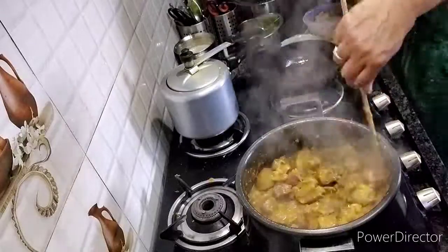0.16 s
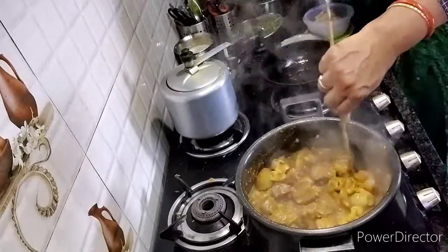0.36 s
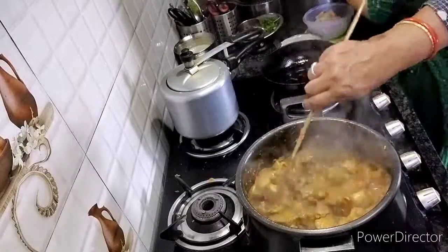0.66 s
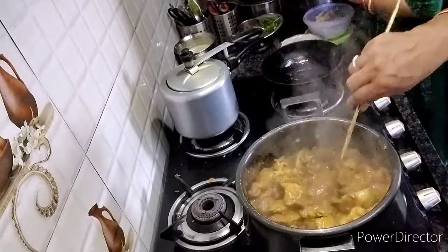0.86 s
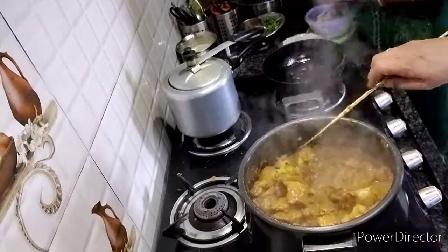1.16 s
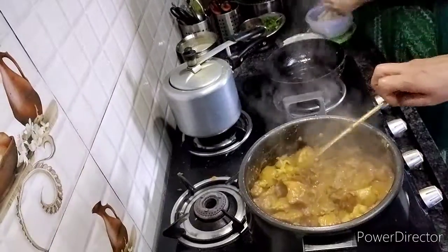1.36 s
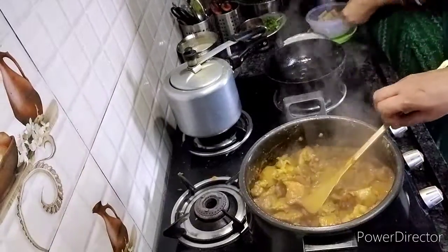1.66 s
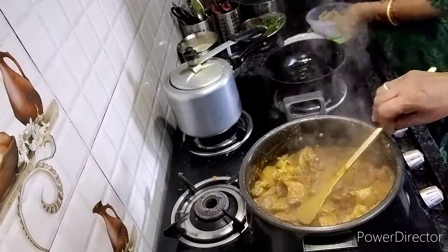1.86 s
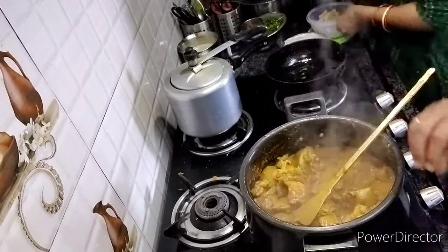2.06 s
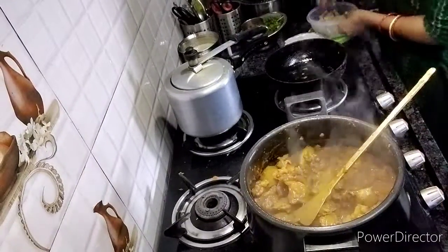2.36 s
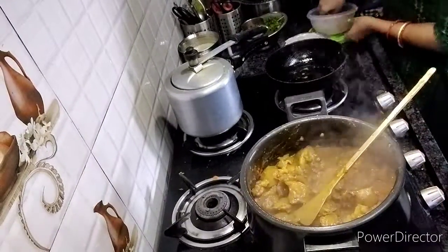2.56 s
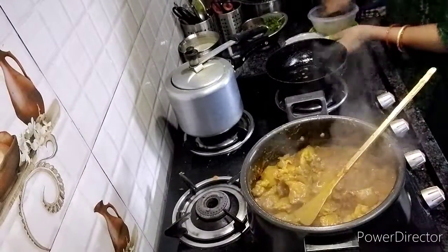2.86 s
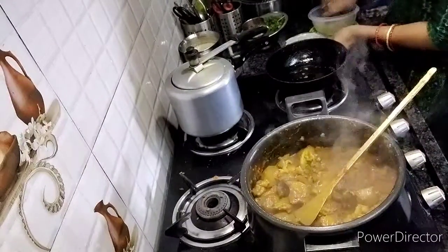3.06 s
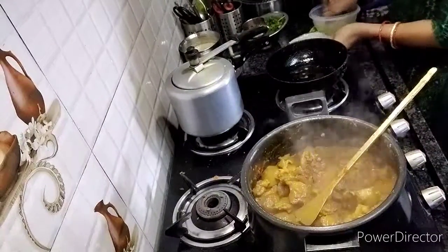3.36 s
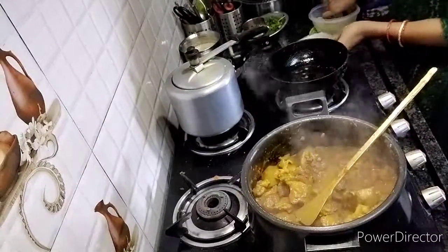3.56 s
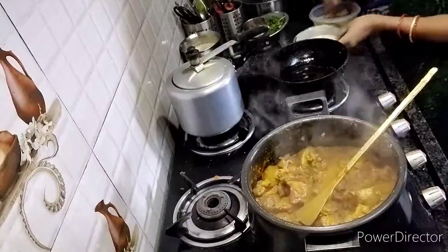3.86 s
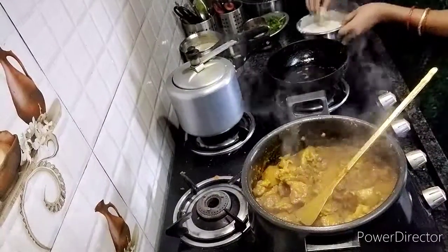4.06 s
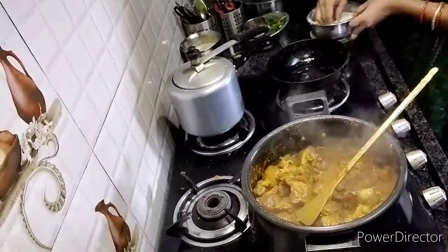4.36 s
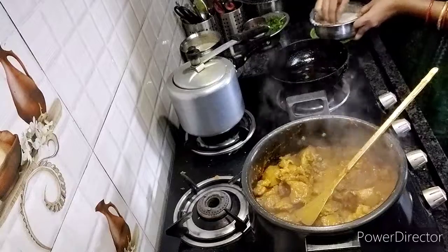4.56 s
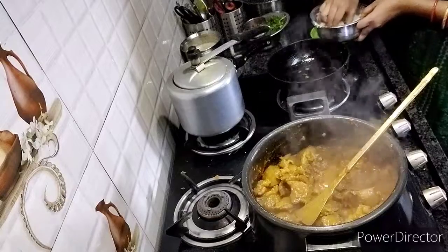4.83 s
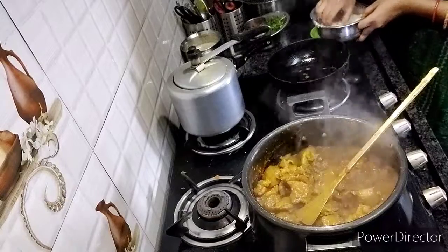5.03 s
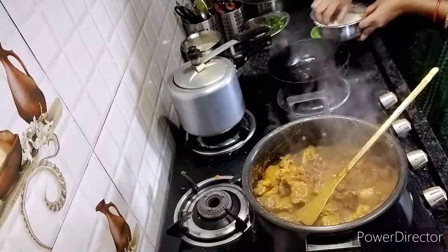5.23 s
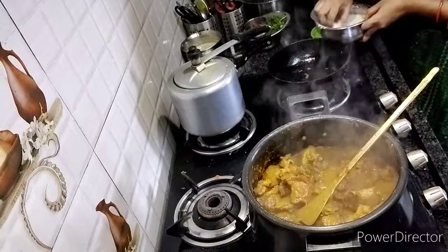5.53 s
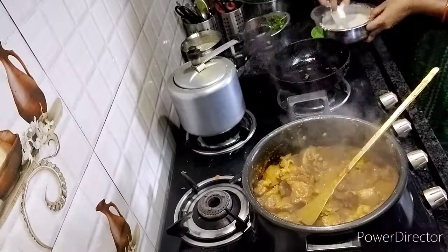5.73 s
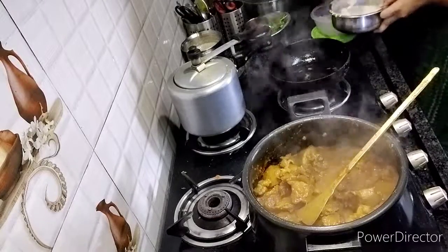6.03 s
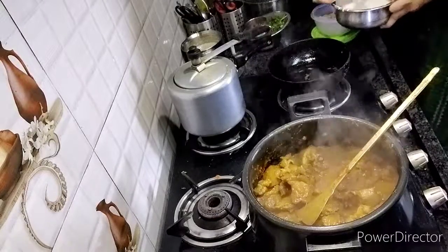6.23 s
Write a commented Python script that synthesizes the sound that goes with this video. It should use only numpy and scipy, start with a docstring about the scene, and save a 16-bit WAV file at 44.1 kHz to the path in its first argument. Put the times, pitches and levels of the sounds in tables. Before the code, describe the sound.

A gas flame and simmering curry make a very quiet low murmur with fine bubbling hiss throughout, swelling slightly around 1.4 and 4.4 s, with barely audible wavering hums. From 0 to 0.6 s a blade makes soft wet smacks, with small clicks at 0.2 and 0.45 s. At 1.0 s the wooden spatula hits the steel pot's rim: a sudden loud, hollow, tightly chattering knock, with a short midrange metallic ring and tiled-room echoes. Lighter bounces and dull bumps follow until about 1.4 s, then small clicks to 1.7 s. Around 1.8 to 2.7 s only faint ticks remain. From 2.7 s to the end at 6.4 s, farther back, dry grains crunch and trickle in irregular short scoops, mixed with crisp bowl and tub clicks, clustered near 3.1 and 5.75 s, and tiny high clinks near 4.2 and 4.6 s.

```python
"""A gas flame and simmering curry murmur softly from the start, as shaped noise with bursting bubbles.
A blade pushes wetly through the curry amid small clicks and clinks, modelled as grains, noise and modes.
The wooden spatula then knocks on the steel pot's rim: contact pulses excite resonances and tiled-room echoes.
Behind the stove a hand scoops something dry from a plastic tub into a steel bowl: showers of grain impacts."""
import sys
import numpy as np
from scipy import signal
from scipy.fft import rfft, irfft
from scipy.io import wavfile

SR = 44100
rng = np.random.default_rng(int(sys.argv[2]) if len(sys.argv) > 2 else 0)


def dump_mix(stems):
    """Bounce the given channels to the path in sys.argv[1] as a 16-bit WAV at rate SR."""
    frames = np.atleast_2d(stems).T  # one column per channel
    limited = np.clip(frames, -1, 1)  # hard clip at full scale
    pcm = np.round(limited * 32767).astype(np.int16)
    wavfile.write(sys.argv[1], SR, pcm)


N = 282012
TIME = np.arange(N) / SR  # s

# Spectrum of the flame and simmer: f/Hz, relative level/dB
MURMUR_SPECTRUM = [(30, -21.5), (55, -7), (90, 0.5), (170, 0.5), (250, -3), (340, -7.5), (560, -2.5),
                   (750, -11), (1130, -5), (1400, -15), (1750, -12.5), (3000, -26), (6000, -42)]
MURMUR_DB = -65  # at mean vigour, before flutter
MURMUR_FOLLOWS = 0.18  # share of the sizzle's swing, dB per dB
FLUTTER_DB, FLUTTER_PER_S = 1.5, 14
# Sizzle through time: t/s, level/dB
SIZZLE_LEVEL = [(0, -69.5), (.9, -71), (1.35, -64.5), (1.9, -74.5), (2.5, -73), (2.9, -68), (4.4, -65),
                (5.0, -74), (6.39, -74.5)]
# Spectrum of the sizzle: f/Hz, relative level/dB
SIZZLE_SPECTRUM = [(600, -11.5), (1500, -4), (3000, -4), (4400, -1), (7500, -6), (8200, -9.5), (12000, -15),
                   (15000, -18.5)]
# Faint wavering tones: f/Hz, reference level/dB
HUM_TONES = [(290.7, -79), (577, -68.5)]
HUM_REST_DB = -5.5  # between swells, re the reference level
# Swells of the tones: t/s, rise/dB, half width/s
HUM_SWELLS = [(1.55, 10.5, 0.19), (2.56, 10.5, 0.18), (3.6, 6.5, 0.27)]
# Brief dips of the background level: t/s, change/dB, half width/s
BACKGROUND_DIPS = [(0.794, -34, 0.019), (0.887, -10.5, 0.034), (1.925, -14, 0.011), (4.491, -13, 0.012)]

# Pushes of the blade through the curry: t at full speed/s, length/s, level/dB
BLADE_PUSHES = [(.02, .07, -61.5), (.43, .03, -62.5), (.58, .06, -66.5), (1.3, .15, -75)]
# Spectrum of the wet smacks: f/Hz, relative level/dB
STIR_SPECTRUM = [(150, -14), (500, -1), (1600, 0.5), (2400, -5), (4000, -6.5), (8000, -16.5), (15000, -28)]
PUSH_RISE_DB_PER_S, PUSH_T60_S = 399, 0.33

# Utensils and bowls touching: t/s, level before filtering/dB, lows re middle/dB, highs re middle/dB;
# the level and both tilts receive common offsets in clicks()
TOUCHES = [(0.237, -38, -4.5, -25.5), (0.458, -43.5, -4, -21), (0.833, -56.5, 9, -21),
           (.954, -46, -17, -18.5), (1.251, -43.5, 8, -30), (1.3826, -46, 13.5, -28),
           (1.535, -37.5, -2, -13.5), (1.582, -45.5, 3, -16), (1.701, -34.5, 2, -31),
           (1.959, -46.5, 2, -24), (2.6878, -44.5, -1.5, -10.5), (3.1027, -33.5, -18.5, -19.5),
           (3.119, -35, -3, -10.5), (3.1434, -31.5, -5, -18), (3.254, -34.5, -13, -8.5),
           (3.4377, -37.5, -28, -15.5), (3.491, -37, -26.5, -6), (3.7414, -38, 1, -12),
           (3.9977, -38.5, -5, -8.5), (4.037, -38, -7, -10), (4.101, -48, -18.5, -12),
           (4.2174, -36, -6, -10), (4.2728, -44.5, 1, -1), (4.5145, -44.5, -4, -20.5),
           (4.583, -40, -9, -1.5), (4.7235, -31, -14, -15), (5.0574, -35.5, -5, -11.5),
           (5.4723, -33.5, -4, -11), (5.5864, -41.5, 0.5, -9.5), (5.7193, -40.5, -4, -14.5),
           (5.7513, -34.5, -5.5, -21), (5.7759, -31.5, -7, -15), (6.131, -37, -2, -12.5),
           (6.3512, -44.5, -6.5, -19)]
# Common spectrum of the touches: f/Hz, relative level/dB
TOUCH_SPECTRUM = [(150, -5.5), (500, 4), (1200, 0), (3000, 3), (4400, 6.5), (6200, 0.5), (7500, 7),
                  (9000, 6), (15000, 0)]
# Fainter touches come at random while the hand reaches for the tub
REACH_FROM_S, REACH_UNTIL_S = 1.8, 2.9
FAINT_DB, FAINT_SPREAD_DB, FAINT_LOW_DB, FAINT_TOP_DB = -53.5, 2, -4.5, -25

# Decay of the room: f/Hz, t60/s
ROOM_DECAY = [(100, 0.99), (500, 0.53), (1200, 0.38), (2500, 0.38), (5000, 0.18), (14000, .22)]

# Thin clinks, as of bangles: t/s, impulse level/dB
BANGLE_TAPS = [(0.43, -58), (4.223, -42), (4.608, -42), (5.955, -55.5)]
# Modes of a clink: f/Hz, relative level/dB, t60/s
BANGLE_MODES = [(14080, -9, 0.056), (13860, -1, 0.065)]

# The spatula hits the rim and chatters: each contact comes sooner, is duller and carries less into the room
BLOW_S, CHATTER_GAP_S, GAP_SHRINK = 1.0078, .004, .85
BLOW_DB, BLOW_BRIGHT_HZ, DULLING = 1.5, 2500, 0.81
BLOW_ROOM_DB, ROOM_LOSS_DB = 3, 1.5
FIRST_SOFTER_DB = 4.5  # the blade gives at first, then bears down
# Lighter contacts, a graze before the blow and bounces after it:
# t/s, force level/dB, contact brightness f/Hz, share sent to the room/dB
LIGHT_CONTACTS = [(1.0047, -11, 1500, -13), (1.0368, -12.5, 1500, -3), (1.084, -11, 1980, 5.5),
                  (1.1217, -16, 2600, -0.5), (1.136, -12, 1110, -6), (1.2474, -27.5, 2600, 8)]
# Broad resonances of blade and loaded pot: f/Hz, width/Hz, relative level/dB
BODY_RESONANCES = [(305, 170, -6.5), (530, 220, 2.5), (805, 87, -7.5), (1110, 260, -10), (1660, 170, -16),
                   (2600, 980, -21), (4000, 1300, -24)]
# Modes of the pot wall: f/Hz, relative level/dB, t60/s
POT_MODES = [(205, -15, .45), (300, 7, .15), (377, -4, .42), (430.5, -2, .55), (483.5, -5, .5),
             (523.5, 0, .52), (557, -4, .55), (598, -9, .42), (622, -8, .42), (662, 0, .52),
             (708.5, -8, .42), (766, -8, .38), (803, -5, .55), (840, -7, .42), (868, -4, .45),
             (953, -8, .38), (1062, -8, .38), (1115, -4, .4), (1200, -9, .36), (1275, -13, .4),
             (1787, -14, .38), (1906, -18, .44), (2240, -21, .35), (2654, -23, .32), (3031, -23, .3)]
RING_DB, FADE_S, FADE_T60_S = -20.5, 1.26, 0.078
# Spectrum of the knock sent into the room: f/Hz, gain/dB
ROOM_SPREAD = [(150, -1.5), (300, -9), (550, -8.5), (900, -3), (1400, -2), (2500, 2), (4000, 5.5),
               (8000, 8.5)]

# Dull bumps of the pot and other heavy things: t/s, level/dB, f/Hz, t60/s
HEAVY_BUMPS = [(1.138, -25, 290, .12), (1.245, -30, 118, .11), (1.378, -41, 335, .09),
               (1.442, -50, 480, .08), (1.815, -51, 370, .12), (3.683, -49, 430, .1)]

# Strokes of the fingers through the grains: t at full speed/s, length/s, level/dB
SCOOP_STROKES = [(2.705, 0.0082, -57.5), (2.82, .035, -46), (3.01, 0.14, -55.5), (3.125, 0.13, -55),
                 (3.3, 0.033, -51), (3.465, 0.07, -51), (3.605, .025, -53.5), (3.69, 0.066, -49),
                 (4.04, 0.068, -49), (4.22, 0.032, -48.5), (4.565, 0.035, -46.5), (4.735, 0.031, -52.5),
                 (5.075, 0.044, -50.5), (5.2, 0.33, -56), (5.78, 0.16, -57), (5.925, 0.075, -53.5),
                 (6.15, 0.0067, -49.5), (6.345, 0.047, -63.5)]
# Spectrum of the grains: f/Hz, relative level/dB
GRAIN_SPECTRUM = [(120, -9), (200, -5), (327, -11.5), (554, 0.5), (618, -10.5), (827, -2.5), (906, -5.5),
                  (1510, -8.5), (2090, -6), (3680, -8.5), (4180, -3), (7480, -8), (13400, -21),
                  (14400, -18), (15500, -29.5)]
# A stroke gathers speed quickly; the grains then trickle to rest
SCOOP_RISE_DB_PER_S, SCOOP_T60_S = 579, 0.27

CUTOFF_HZ = 15450


def from_db(db):
    """Logarithmic level: decibels become an amplitude gain."""
    return 10 ** (np.asarray(db) / 20)


def rms_one(x):
    """Power normalisation: scale a signal to rms 1."""
    return x / np.sqrt(np.mean(x ** 2) + 1e-20)


def at_hz(points, hz):
    """Logarithmic frequency scale: interpolate a table between octaves evenly."""
    f, value = np.transpose(points)
    return np.interp(np.log(np.maximum(hz, 1)), np.log(f), value)


def drift(rate):
    """Slow random modulation: join random knots by lines, with rms 1."""
    knots = rng.standard_normal(int(N / SR * rate) + 2)
    return rms_one(np.interp(TIME * rate, np.arange(len(knots)), knots))


def bumps(rows):
    """Gaussian modulation: smooth rises or dips of a level, in dB."""
    return sum(db * np.exp(-((TIME - s) / width) ** 2) for s, db, width in rows)


def coloured(x, spectrum):
    """Minimum-phase filtering: fold the cepstrum to make a causal filter of given spectrum."""
    size = 4096
    level_db = at_hz(spectrum, np.arange(size // 2 + 1) * SR / size)
    cepstrum = irfft(np.log(from_db(level_db)))
    cepstrum[1:size // 2] *= 2
    cepstrum[size // 2 + 1:] = 0
    response = irfft(np.exp(rfft(cepstrum)))
    return signal.fftconvolve(x, response)[:len(x)]


def filtered(x, order, cut_hz, kind="low"):
    """Frequency selection: a Butterworth filter with a maximally flat passband."""
    return signal.sosfilt(signal.butter(order, cut_hz, kind, fs=SR, output="sos"), x)


def add(out, s, sound):
    """Superposition: mix a sound in at time s."""
    i = int(s * SR)
    out[i:i + len(sound)] += sound[:N - i]


def ring(x, hz, t60):
    """Damped oscillator: a unit impulse starts a decaying sine of height 1."""
    r, w = from_db(-60 / (t60 * SR)), 2 * np.pi * hz / SR
    return signal.lfilter([0, np.sin(w)], [1, -2 * r * np.cos(w), r * r], x + 1e-18)


def resonance(x, hz, width):
    """Driven resonance: a band-pass response with peak gain 1."""
    r = np.exp(-np.pi * width / SR)
    numerator = np.array([1, 0, -1]) * (1 - r * r) / 2
    return signal.lfilter(numerator, [1, -2 * r * np.cos(2 * np.pi * hz / SR), r * r], x + 1e-18)


def grains(per_s, spread_db, t60):
    """Random impact process: tiny uneven impacts each start a decaying noise burst; rms 1."""
    struck = rng.random(N) < per_s / SR
    sizes = from_db(spread_db * np.minimum(rng.exponential(1, N), 3.5)) * struck
    energy = signal.lfilter([1], [1, -from_db(-120 / (t60 * SR))], sizes ** 2 + 1e-18)
    return rms_one(np.sqrt(energy) * rng.standard_normal(N))


def strokes(rows, rise_db_per_s, t60):
    """Power addition of hand strokes: each swells, holds for its length and dies away."""
    power = 0
    for s, length, db in rows:
        short_db = rise_db_per_s * np.maximum(s - TIME, 0)
        fall_db = 60 * np.maximum(TIME - s - length, 0) / t60
        power = power + from_db(db - short_db - fall_db) ** 2
    return np.sqrt(power)


def stove(rumble_cut_hz=45, pop_share_db=-4):
    """Turbulent noise and bubble bursts: flame, steam hiss and pops sound with two wavering tones."""
    sizzle_db = np.interp(TIME, *np.transpose(SIZZLE_LEVEL))
    swing_db = MURMUR_FOLLOWS * (sizzle_db - sizzle_db.mean())
    flame_db = MURMUR_DB + swing_db + FLUTTER_DB * drift(FLUTTER_PER_S)
    flame = from_db(flame_db) * rms_one(coloured(rng.standard_normal(N), MURMUR_SPECTRUM))
    flame = filtered(flame, 2, rumble_cut_hz, "high")

    pops = from_db(pop_share_db) * grains(120, spread_db=0.5, t60=.04)
    steam = rng.standard_normal(N)
    fizz = from_db(sizzle_db) * rms_one(coloured(pops + steam, SIZZLE_SPECTRUM))

    swell_db = HUM_REST_DB + bumps(HUM_SWELLS)
    hum = 0
    for hz, db in HUM_TONES:
        tone_gain = from_db(db + swell_db + 0.66 * drift(3.5))
        hum = hum + tone_gain * np.sin(2 * np.pi * hz * TIME + drift(2.2))  # phase wanders by 1 rad rms
    return (flame + fizz + hum) * from_db(bumps(BACKGROUND_DIPS))


def stirring():
    """Granular excitation: wet little smacks follow the blade as it pushes the pieces about."""
    smacks = rms_one(coloured(grains(800, spread_db=5.5, t60=0.022), STIR_SPECTRUM))
    return strokes(BLADE_PUSHES, PUSH_RISE_DB_PER_S, PUSH_T60_S) * smacks


def faint_touches(count=9):
    """Jittered timing: light ticks at uneven intervals, as rows like those of TOUCHES."""
    gap = (REACH_UNTIL_S - REACH_FROM_S) / count
    rows = []
    for k, (when, size) in enumerate(rng.random((count, 2))):
        db = FAINT_DB + FAINT_SPREAD_DB * (2 * size - 1)
        rows.append((REACH_FROM_S + gap * (k + when), db, FAINT_LOW_DB, FAINT_TOP_DB))
    return rows


def clicks(level_db=-1.0, t60=0.04, low_db=3, top_db=6, rise_s=0.0023):
    """Micro-contact noise: each touch is a short decaying rattle with its own spectrum."""
    out, t = np.zeros(N), TIME[:SR // 10]
    for s, db, low, top in TOUCHES + faint_touches():
        envelope = from_db(db + level_db - 60 * t / t60) * (1 - np.exp(-t / rise_s))
        rattle = rng.standard_normal(len(t)) * envelope
        tilt = [(1200, low + low_db), (3000, 0), (6500, 0), (10000, top + top_db)]
        add(out, s, coloured(rattle, tilt))
    return coloured(out, TOUCH_SPECTRUM)


def reflections(build_s):
    """Diffuse reverberation: a dense unit-energy tail off the tiles, its decay set band by band."""
    t, tail = TIME[:SR // 2], 0
    edges = np.geomspace(60, 18000, 15)
    for low, high in zip(edges, edges[1:]):
        band = filtered(rng.standard_normal(len(t)), 2, [low, high], "band")
        t60 = at_hz(ROOM_DECAY, np.sqrt(low * high))
        tail = tail + band * from_db(-60 * t / t60)
    tail = tail * (1 - np.exp(-(t / build_s) ** 2))
    return tail / np.sqrt(np.sum(tail ** 2))


def kitchen(x, build_s, count=5):
    """Time-varying reverberation: a moving source excites a changing mixture of echo patterns."""
    weights = np.array([drift(5) for _ in range(count)])
    weights /= np.sqrt(np.sum(weights ** 2, axis=0))
    return sum(signal.fftconvolve(x * w, reflections(build_s))[:N] for w in weights)


def bangles():
    """Modal vibration: taps excite very high, short rings."""
    taps = np.zeros(N)
    for s, db in BANGLE_TAPS:
        add(taps, s, from_db([db]))
    return sum(from_db(db) * ring(taps, hz, t60) for hz, db, t60 in BANGLE_MODES)


def contacts(count=4):
    """Repeated impact: list the chatter, then the lighter contacts, in LIGHT_CONTACTS columns."""
    chatter = []
    for k in range(count):
        s = BLOW_S + CHATTER_GAP_S * (1 - GAP_SHRINK ** k) / (1 - GAP_SHRINK)  # geometric gaps
        force_db = BLOW_DB - FIRST_SOFTER_DB * (k == 0)
        chatter.append((s, force_db, BLOW_BRIGHT_HZ * DULLING ** k, BLOW_ROOM_DB - ROOM_LOSS_DB * k))
    return chatter + LIGHT_CONTACTS


def body(force, gain_db=24, low_cut_hz=240):
    """Resonant radiation: blade and loaded pot give a hollow knock, too small to radiate bass."""
    modes = sum(from_db(db) * resonance(force, hz, width) for hz, width, db in BODY_RESONANCES)
    return filtered(from_db(gain_db) * modes, 3, low_cut_hz, "high")


def spatula(stagger_s=.008, deepest_db=-14, wood_cut_hz=4800, direct_db=3, wall_cut_hz=190):
    """Impact excitation: soft wooden contacts drive the body, the pot's modes and separate echoes."""
    force, echoes, blow, t = np.zeros(N), np.zeros(N), np.zeros(N), TIME[:SR // 100]
    for s, db, bright_hz, room_db in contacts():
        pulse = t ** 2 * np.exp(-2 * np.pi * bright_hz * t)
        pulse = from_db(db) * pulse / pulse.sum()
        add(force, s, pulse)
        # each contact is at another spot, so it has echoes of its own
        add(echoes, s, from_db(room_db) * signal.fftconvolve(pulse, reflections(build_s=0.013)))

    # the wall's modes start ringing at scattered moments during the chatter
    add(blow, BLOW_S, from_db([RING_DB]))
    lags = (rng.random(len(POT_MODES)) * stagger_s * SR).astype(int)
    wall = 0
    for lag, (hz, db, t60) in zip(lags, POT_MODES):
        wall = wall + from_db(db) * ring(np.roll(blow, lag), hz, t60)
    wall = filtered(wall, 3, [wall_cut_hz, 3500], "band")

    # after FADE_S the ring and echoes fade faster, by a limited amount
    drop_db = -60 * np.maximum(TIME - FADE_S, 0) / FADE_T60_S
    faded = from_db(np.maximum(drop_db, deepest_db))
    # wood is soft, so the direct knock has little treble
    direct = from_db(direct_db) * body(filtered(force, 2, wood_cut_hz))
    return direct + faded * (wall + body(coloured(echoes, ROOM_SPREAD)))


def thumps(rise_s=0.0029):
    """Damped low-frequency vibration: heavy things give dull bumps that soon die."""
    out, t = np.zeros(N), TIME[:SR // 2]
    for s, db, hz, t60 in HEAVY_BUMPS:
        envelope = from_db(db - 60 * t / t60) * (1 - np.exp(-(t / rise_s) ** 2))
        add(out, s, envelope * np.sin(2 * np.pi * hz * t))
    return out


def scooping(level_db=0, per_s=1300, low_db=-2, rumble_cut_hz=50):
    """Granular friction: dry grains rub and fall, and a harder stroke moves more of them."""
    effort = strokes(SCOOP_STROKES, SCOOP_RISE_DB_PER_S, SCOOP_T60_S)
    rate = per_s * (effort / effort.max() + 0.33)  # impacts per second
    # dividing by the root of the rate leaves the loudness to the effort
    crunch = grains(rate, spread_db=7.0, t60=0.029) / np.sqrt(rate)
    crunch = coloured(crunch, GRAIN_SPECTRUM)
    crunch = coloured(crunch, [(700, low_db), (2000, low_db / 2), (4000, 0)])
    crunch = filtered(crunch, 2, rumble_cut_hz, "high")
    return from_db(level_db) * effort * rms_one(crunch)


def scene(handling_room_db=-4):
    """Direct and reverberant fields: the pot is near, the handling farther back and wetter."""
    handling = clicks() + bangles() + scooping()
    handling_echoes = from_db(handling_room_db) * kitchen(handling, build_s=0.0045)
    pot = stirring() + spatula() + thumps()
    return (stove() + pot + handling + handling_echoes)[None]


def record(dry):
    """Saturation and band limiting: round the loudest peaks and cut the top steeply."""
    rounded = dry / (1 + (dry / .88) ** 6) ** (1 / 6)
    return signal.sosfilt(signal.ellip(10, .2, 70, CUTOFF_HZ, fs=SR, output="sos"), rounded)


dry = scene()
out = record(dry)
dump_mix(out)
```